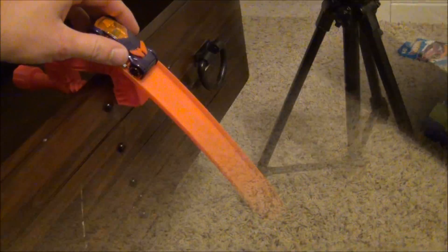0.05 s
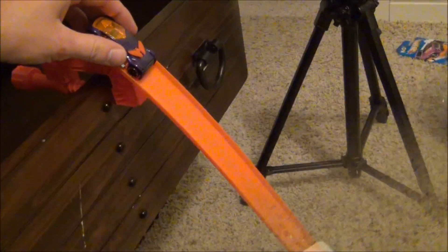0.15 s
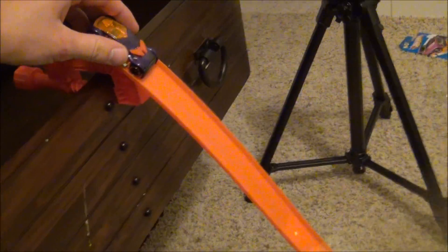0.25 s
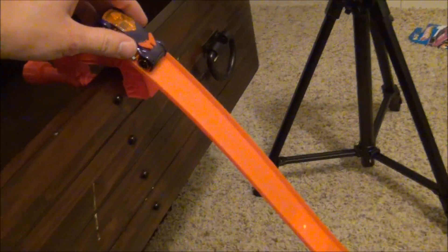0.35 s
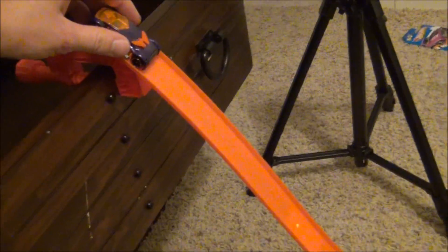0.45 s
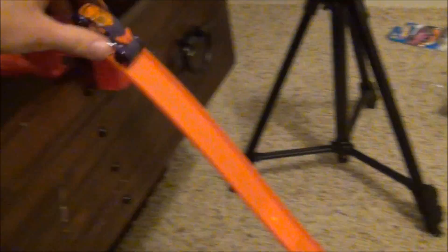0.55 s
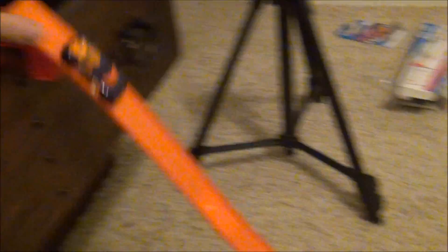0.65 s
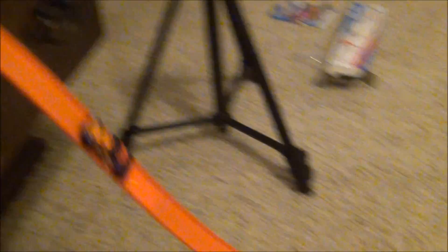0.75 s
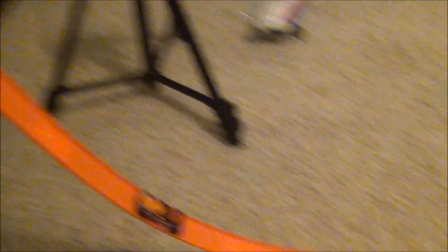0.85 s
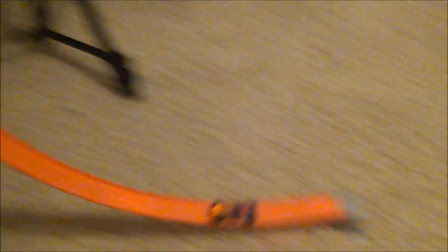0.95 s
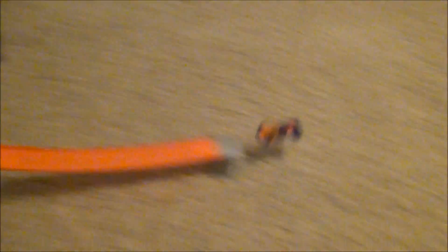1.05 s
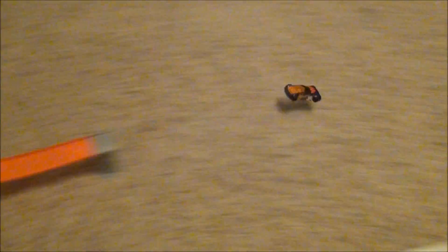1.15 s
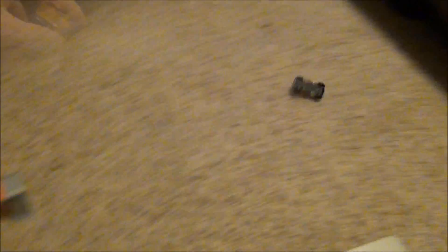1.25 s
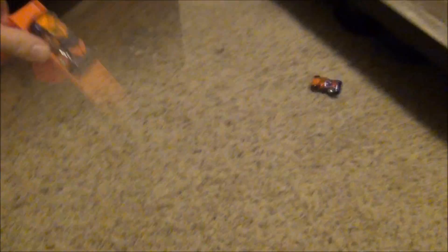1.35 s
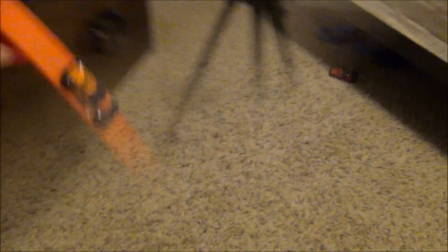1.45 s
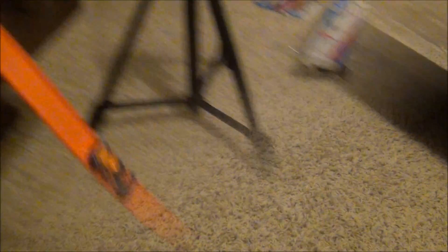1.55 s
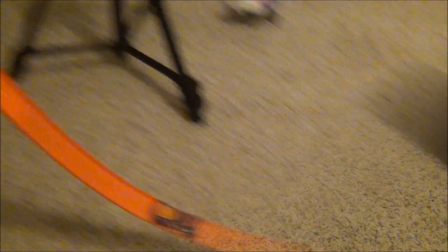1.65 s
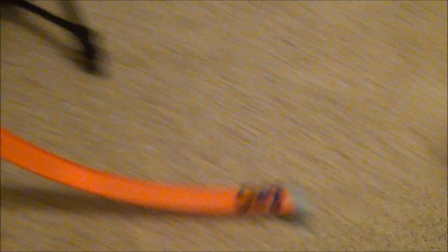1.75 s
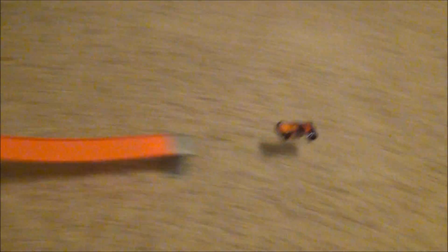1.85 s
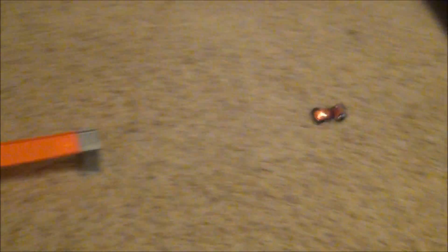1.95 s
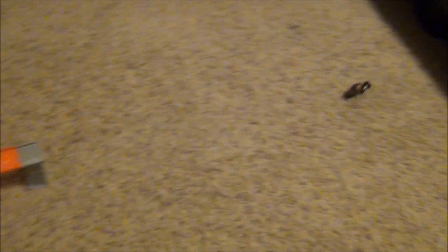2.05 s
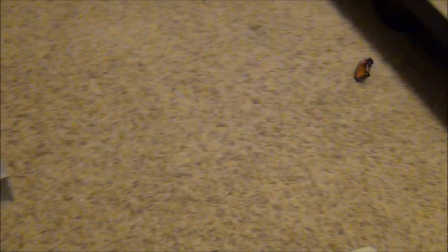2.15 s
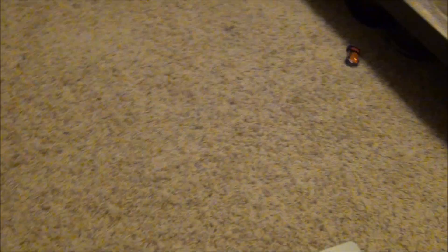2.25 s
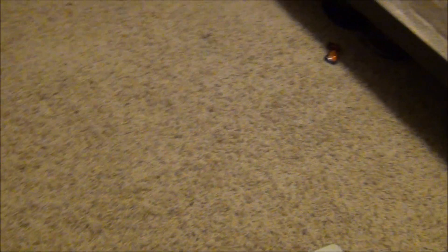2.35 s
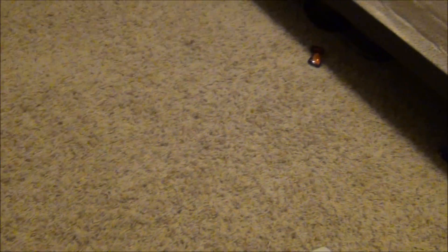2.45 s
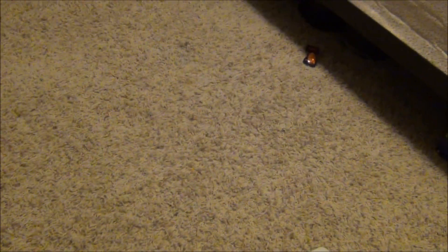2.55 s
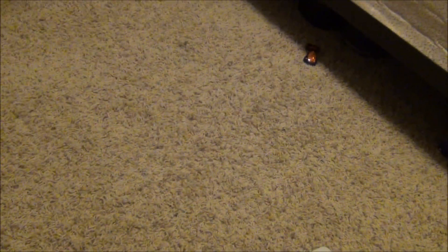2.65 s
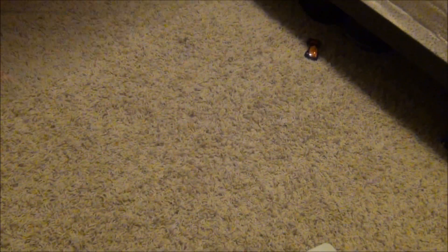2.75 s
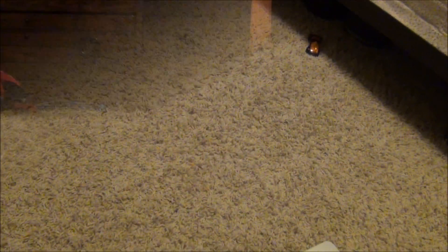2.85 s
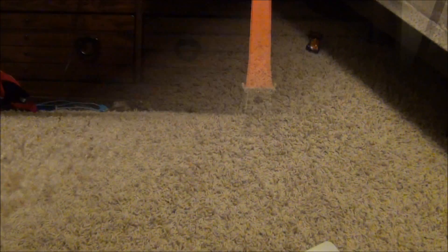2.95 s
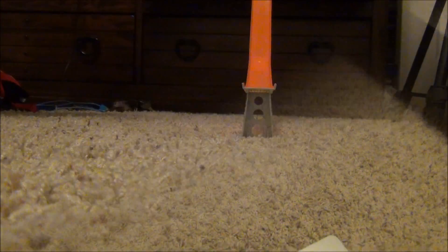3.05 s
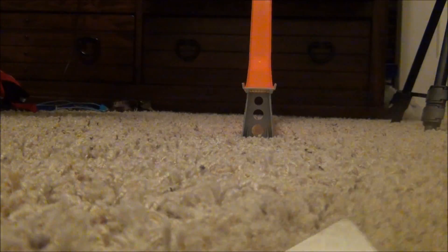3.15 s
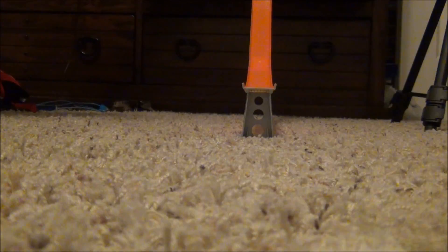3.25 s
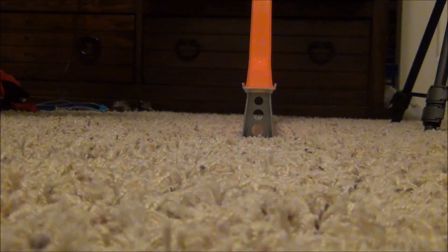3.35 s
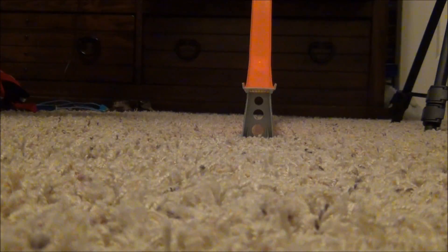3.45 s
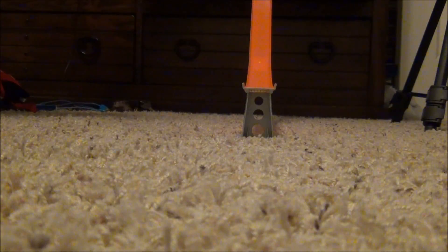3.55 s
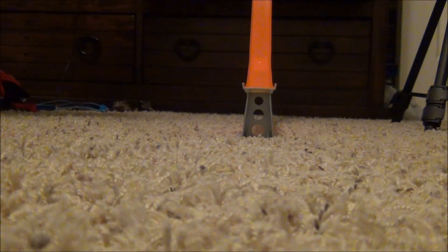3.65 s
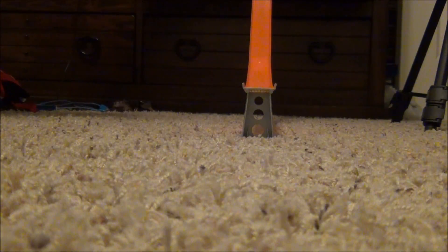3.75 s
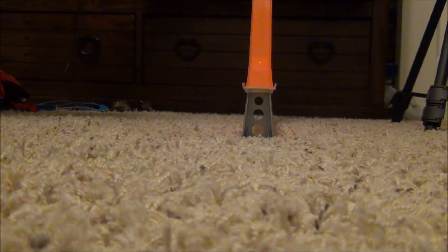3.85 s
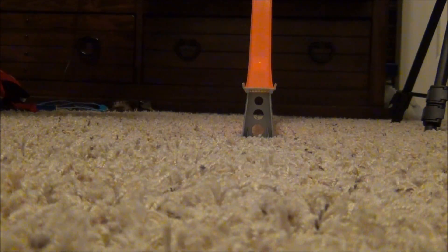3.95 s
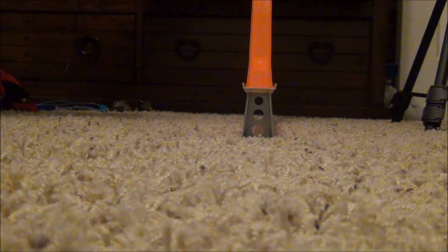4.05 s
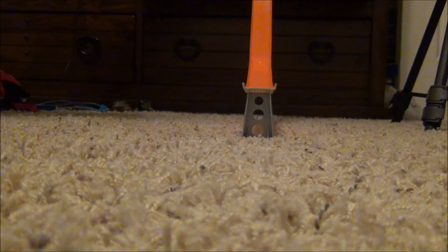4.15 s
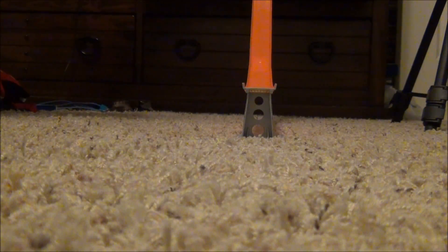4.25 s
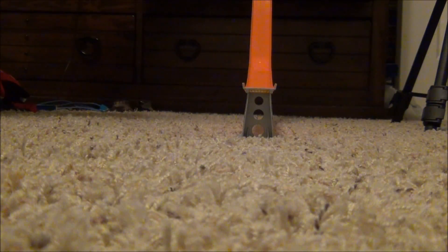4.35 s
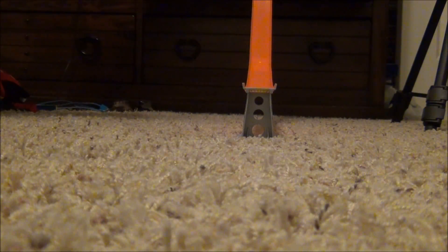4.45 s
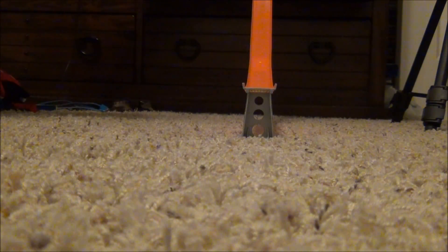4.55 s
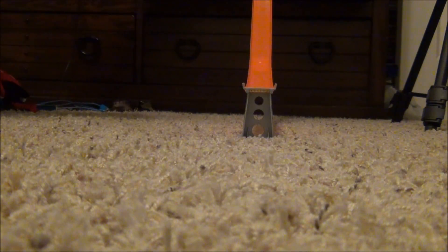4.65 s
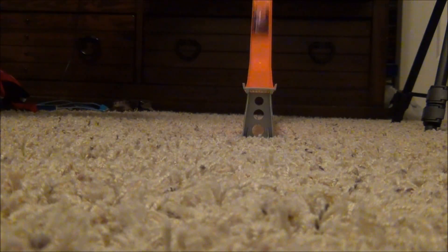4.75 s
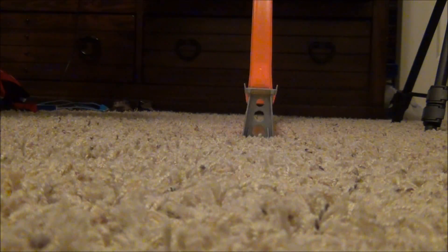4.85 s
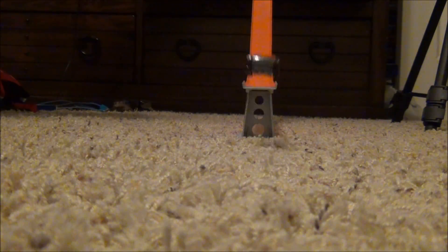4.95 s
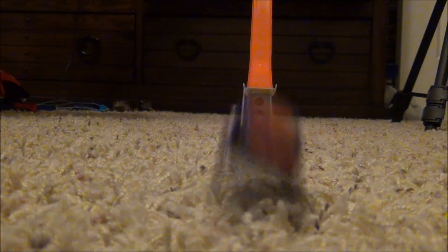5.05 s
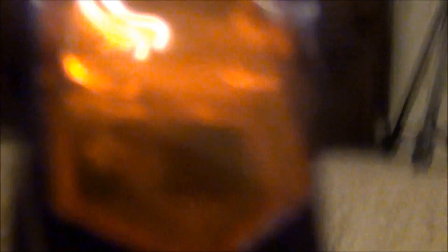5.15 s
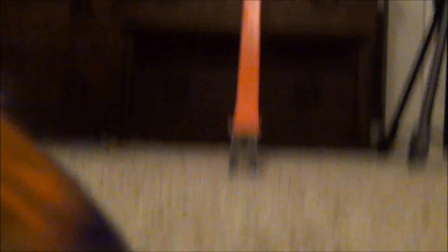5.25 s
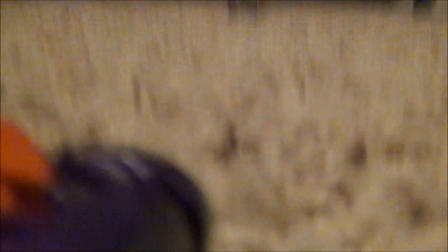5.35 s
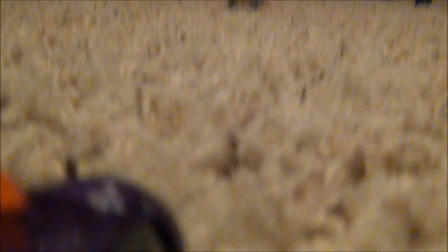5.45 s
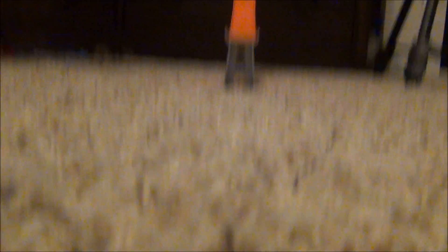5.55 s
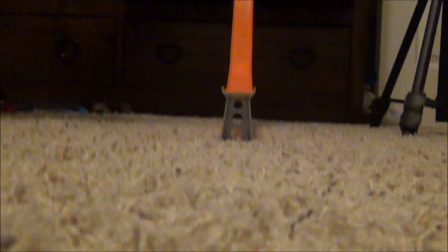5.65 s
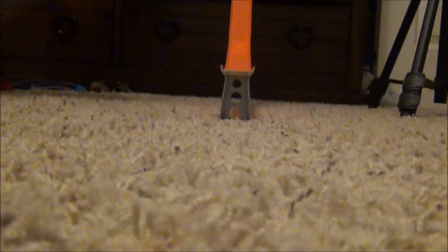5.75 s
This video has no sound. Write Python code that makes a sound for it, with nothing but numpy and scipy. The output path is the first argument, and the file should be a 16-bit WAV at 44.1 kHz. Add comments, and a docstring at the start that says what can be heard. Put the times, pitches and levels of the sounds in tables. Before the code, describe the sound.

A carpeted bedroom, heard closely in stereo with low room tone and hiss. A soft, low zoom motor hum runs until 0.5 s and stops dead. At 0.65 s a small die-cast car starts down a plastic track, its hard-wheeled roar growing louder and brighter until it flies off at 1.1 s, wheels buzzing, and lands with bright knocks at 1.3 s. A second run overlaps from 1.4 to 1.85 s, with a hollow clack at 1.7, then buzzing wheels and tumbling knocks until about 2.5 s. Handling makes a sharp cluster of cracks around 2.75-3.05 s, small plastic ticks, a big booming clack at 3.57 s and more ticks to 4.33 s. A third run rolls from 4.55 to 5.02 s, more colored and slightly softer; at 5.18-5.5 s the car slams and skitters against the camera with dull case thumps, moving left. Two faint ticks end near 5.7 s.

```python
"""A zoom motor hums and stops, then a die-cast toy car runs three times down a plastic track in a carpeted bedroom.
It flies off, lands and tumbles with buzzing wheels; the track gives sharp hollow clacks, the first two struck
by the car, the rest by handling; the last run ends with the car skittering into the camera.
Rolling and spinning are dense trains of tiny random blows; knocks, clacks and ticks are shaped noise bursts with
rings; booms, case bumps and motor hum are sines; the air and the swaying strip are coloured noise."""
import sys
import numpy as np
from scipy import signal
from scipy.fft import rfft, irfft, next_fast_len
from scipy.io import wavfile
from scipy.ndimage import uniform_filter1d, map_coordinates

SR = 44100
rng = np.random.default_rng(int(sys.argv[2]) if len(sys.argv) > 2 else 0)


def persist_wave(psi):
    """Save psi, clipped to +-1, as 16-bit WAV."""
    counts = np.round(np.clip(psi, -1, 1) * 32767).astype(np.int16)
    wavfile.write(sys.argv[1], SR, np.atleast_2d(counts).T)


N = 256220  # length [samples]

# wheels chattering on their axles, spectrum: (frequency [Hz], relative level [dB per Hz])
AXLE_CHATTER = [(2500, -16), (5000, -4), (7400, -3.5), (8800, -5.5), (10200, -1.5), (10800, 0.5),
                (11300, 2), (12300, -7), (15800, -9)]
# sharp crack of hard plastic, spectrum: (frequency [Hz], relative level [dB per Hz])
SHARP_CRACK = [(150, -33), (900, -22), (1600, 6.5), (2300, -8), (3700, 3.5), (4700, -6), (8000, -5.5),
               (15800, -2)]


def amp(db):
    """Decibels to gain."""
    return 10 ** (np.asarray(db) / 20)


def unit(x):
    """Scale to rms 1."""
    return x / np.sqrt(np.mean(x ** 2) + 1e-20)


def along(points, hz):
    """Interpolate (frequency [Hz], value) points on a log frequency axis."""
    point_hz, values = np.transpose(points)
    return np.interp(np.log(hz + 1), np.log(point_hz), values)


def since(s):
    """Seconds elapsed since time s, zero before it."""
    return np.maximum(np.arange(N) / SR - s, 0)


def gate(start, stop, fade_db_per_s):
    """Quick attack, hold, and a steady fade in decibels after the stop."""
    attack_s = 0.025  # time for the wheels to bite
    return np.minimum(since(start) / attack_s, 1) * amp(-fade_db_per_s * since(stop))


def wobble(rate):
    """A smooth random curve, rate knots a second."""
    knots = rng.standard_normal(int(N * rate / SR) + 4)
    return map_coordinates(knots, [np.arange(N) * rate / SR])


def filtered(x, response):
    """Shape x by a response given as a function of frequency in Hz."""
    m = next_fast_len(N + SR // 2)
    return irfft(rfft(x, m) * response(np.fft.rfftfreq(m, 1 / SR)), m)[..., :N]


def noise(spectrum):
    """Coloured noise of rms 1."""
    return unit(filtered(rng.standard_normal(N), lambda hz: amp(along(spectrum, hz))))


def add(track, s, sound):
    """Mix a sound in at time s."""
    room_left = track[round(s * SR):][:len(sound)]
    room_left += sound[:len(room_left)]


def blow(spectrum, t60, ring_db, tilt=0, focus_hz=4000, focus_db=0, uneven_db=0,
         crack=0.0068, rise=0.00014, size=8192):
    """One contact of energy 1: a crack and a ring of dense modes, coloured by the spot that is struck."""
    t, hz = np.arange(size) / SR, np.fft.rfftfreq(size, 1 / SR)
    # crack and t60 are the times in s to fall by 60 dB
    decay = amp(-60 * t / crack) + amp(ring_db - 60 * t / t60)
    burst = rng.standard_normal(size) * decay * (1 - np.exp(-t / rise))
    spot = uneven_db * map_coordinates(rng.standard_normal(32), [hz / SR * 60])
    focus = focus_db * np.exp(-(np.log2((hz + 1) / focus_hz) / 0.15) ** 2)
    level = along(spectrum, hz) + tilt * np.log2((hz + 500) / 4000) + spot + focus
    # minimum-phase colouring keeps the attack sharp
    cepstrum = irfft(np.log(amp(level)))
    hit = irfft(rfft(burst) * np.exp(rfft(2 * cepstrum[:size // 2], size)))
    return hit / np.linalg.norm(hit)


def rattle(spectrum, rate, scatter_db, t60, ring_db, uneven_db=0, count=12):
    """Irregular tiny blows, rate a second over count contact points, each with its own ring; about rms 1."""
    out = np.zeros(N)
    number = int(rate / count * N / SR)
    for point in range(count):
        places = rng.integers(N, size=2000)
        sizes = np.clip(rng.standard_normal(2000), -2, 1.6)
        # the car rocks, so its weight and the colour shift from point to point
        load = 4 * np.clip(rng.standard_normal(N // 1200 + 1), -2, 1.5)
        blows_db = scatter_db * sizes + load[places // 1200]
        kicks = np.bincount(places[:number], amp(blows_db)[:number], N)
        contact = blow(spectrum, t60, ring_db, uneven_db=uneven_db, crack=0.001)
        out += signal.oaconvolve(kicks, contact)[:N]
    # even out the level over 40 ms, however the blows fall
    power = uniform_filter1d(out ** 2, SR // 25)
    return out / np.sqrt(np.abs(power) + 1e-9)


def widen(mid, side):
    """Two close microphones: nearly alike in the bass, further apart above it."""
    # how much the microphones differ: (frequency [Hz], side share [dB])
    side_share = [(100, -18.5), (250, -14), (600, -7.5), (3000, -5), (15000, -7.5)]
    side = filtered(side, lambda hz: amp(along(side_share, hz)))
    return np.array([mid + side, mid - side])


def nearby(x, scatter_db):
    """Close surfaces scatter the sound differently to each microphone."""
    scatter = blow([(20, 0), (16000, 0)], t60=.02, ring_db=0)
    return widen(x, amp(scatter_db) * signal.oaconvolve(x, scatter)[:N])


def bedroom(x):
    """Walls and furniture answer briefly after 3 ms, the bass dying first."""
    # reverberation of the room: (frequency [Hz], time to fall by 60 dB [s])
    decay_times = [(120, 0.098), (500, 0.096), (3000, 0.26), (8000, 0.26), (15000, 0.22)]
    hz, t, z = signal.stft(rng.standard_normal((2, SR // 2)), SR, nperseg=256)
    fade = amp(-60 * t / along(decay_times, hz)[:, None])
    tail = signal.istft(z * fade, SR, nperseg=256)[1]
    late = np.pad(x, (round(.003 * SR), 0))
    return widen(*signal.fftconvolve(late[None], tail / np.linalg.norm(tail[0]), axes=1)[:, :N])


def air():
    """Wavering low room tone under hiss, both noise stepping in level, with a very faint whine at first."""
    # background stretches: (start [s], room tone level [dB], hiss level [dB])
    stretches = [(0, -47, -51), (1.43, -55.5, -54), (2.735, -46.5, -47.5), (4.0, -48, -50),
                 (5.3, -54, -56.5)]
    # room tone and hiss, spectrum: (frequency [Hz], relative level [dB per Hz])
    hush_spectrum = [(15, -66), (25, -26), (80, -5.5), (126, -3.5), (184, -4), (216, -5.5), (342, -7.5),
                     (587, -7), (729, -9), (905, -4.5), (1060, -12.5), (1360, -12), (3580, -20),
                     (10800, -22), (15800, -21)]
    # narrow whine, spectrum: (frequency [Hz], relative level [dB per Hz])
    whine_spectrum = [(2300, -60.5), (2540, -4), (2600, 3), (2660, -13), (2900, -61.5)]
    starts, *levels = np.transpose(stretches)
    stretch = np.searchsorted(starts[1:], np.arange(N) / SR)
    # each step glides over about 20 ms
    tone, hiss = amp(uniform_filter1d(np.array(levels)[:, stretch], size=900, axis=1))
    hush = widen(noise(hush_spectrum), noise(hush_spectrum))
    low = filtered(hush, lambda hz: 1 / (1 + (hz / 2200) ** 4))
    whine = amp(-61.5 + 1.5 * wobble(25)) * noise(whine_spectrum)
    whine *= np.arange(N) < 2.73 * SR
    return tone * amp(wobble(5.5)) * unit(low) + hiss * unit(hush - low) + whine


def zoom():
    """The zoom motor's gears hum at multiples of the shaft rate, slightly unsteady, and stop dead."""
    # gear hum: (multiple of the shaft rate, relative level [dB])
    harmonics = [(3, -14.5), (4, -8.5), (5, -10.5), (7, -13), (8, 1), (9, -11), (11, -8.5), (13, -10),
                 (15, -12), (17, -7.5), (19, -15), (20, -11.5), (28, -17)]
    # motor noise, spectrum: (frequency [Hz], relative level [dB per Hz])
    motor_spectrum = [(30, -25), (80, 1), (200, -7.5), (480, -5.5), (650, -13.5), (1200, -32),
                      (4000, -28.5)]
    t = np.arange(N) / SR
    turns = 25.68 * t + .008 * wobble(12)  # shaft turns a second, plus jitter
    hum = np.zeros(N)
    for order, db in harmonics:
        phase = order * turns + rng.random()
        hum += amp(db + 1.8 * wobble(11.4)) * np.sin(2 * np.pi * phase)
    running = np.clip((.51 - t) / .01, 0, 1)
    return running * (amp(-34.0) * hum + amp(-43.0) * noise(motor_spectrum))


def swaying():
    """The long strip flexes with a low flutter of noise that swells and dies away."""
    # the strip sways after a run or under the hand: (strongest moment [s], level [dB])
    sways = [(1.135, -40), (1.29, -43), (2.98, -46), (3.5, -39)]
    # flutter, spectrum: (frequency [Hz], relative level [dB per Hz])
    flutter_spectrum = [(40, -17), (100, -2), (130, 1.5), (190, 0.5), (260, -2.5), (400, -14.5), (900, -41)]
    rise_db_per_s, fade_db_per_s = 200, 57
    t = np.arange(N) / SR
    swing = np.zeros(N)
    for s, db in sways:
        swing += amp(db - rise_db_per_s * np.maximum(s - t, 0) - fade_db_per_s * since(s))
    return swing * noise(flutter_spectrum)


def clacks_and_ticks():
    """The track cracks, rings hollow and booms, struck by the car or handled; fingers tick on the plastic."""
    # hollow clacks of the track, the first two struck by the car, the rest by handling:
    # (time [s], crack level [dB], crack brightness [dB per octave], hollow ring level [dB], boom level [dB])
    clacks = [(1.690, -12, -2, -10.5, -11.5), (2.05, -17, 3, -14, -21.5), (2.739, -45, 5, -29, -28),
              (2.8304, -7, 1.5, -18.5, -11), (2.882, -15, 3, -26, -19.5), (2.916, -27.5, 1, -25.5, -16.5),
              (3.036, -45, -1, -23, -27), (3.568, -7, -1, -21, -9.5), (3.875, -57.5, 6, -32.5, -27)]
    # light ticks of plastic under the fingers: (time [s], level [dB], accented frequency [Hz])
    finger_ticks = [(3.143, -24.5, 4650), (3.236, -28, 4800), (3.324, -21, 10600), (3.424, -19.5, 2870),
                    (3.472, -26.5, 2940), (3.55, -28, 4180), (3.761, -25.5, 8100), (3.843, -16.5, 11000),
                    (4.306, -24.5, 9050), (4.329, -26, 4640), (5.669, -36, 2600), (5.727, -37, 3960)]
    # low booming of a clack: (frequency [Hz], relative level [dB], time to fall by 60 dB [s])
    boom_modes = [(131.5, 2, 0.29), (161.8, -5.5, 0.27), (189, -4, 0.31), (248.7, -5, 0.29),
                  (508.6, -4, 0.2), (710, -6, 0.2), (1410, -16, 0.36), (1480, 1, 0.14), (1680, -10, 0.27)]
    # hollow ring, spectrum: (frequency [Hz], relative level [dB per Hz])
    hollow_spectrum = [(60, -36), (200, -15), (330, -2), (500, 0.5), (700, 0), (850, 1), (1200, -1),
                       (1500, -2), (1850, -2.5), (2300, -12.5), (2700, -9), (3800, -9.5), (4600, -17),
                       (15800, -13.5)]
    # ticking plastic, spectrum: (frequency [Hz], relative level [dB per Hz])
    plastic_spectrum = [(200, -19), (1500, -3), (3200, -4.5), (4200, 1.5), (5500, -8.5), (8000, -4.5),
                        (9500, -9), (11500, -1), (15800, -29)]
    out, t = np.zeros(N), np.arange(SR // 2) / SR
    for s, crack_db, tilt, ring_db, boom_db in clacks:
        crack = blow(SHARP_CRACK, t60=.05, ring_db=-28, tilt=tilt, crack=0.014)
        add(out, s, amp(crack_db + 14) * crack)
        add(out, s, amp(ring_db + 20) * blow(hollow_spectrum, t60=.15, ring_db=-4, rise=.001))
        boom = np.zeros(len(t))
        for hz, level, t60 in boom_modes:
            mode_db = level + 2 * rng.standard_normal()
            boom += amp(mode_db - 60 * t / t60) * np.sin(2 * np.pi * hz * t)
        add(out, s, amp(boom_db - 17.0) * boom * (1 - np.exp(-t / 0.0065)))
    for s, db, focus_hz in finger_ticks:
        # a higher tick is also a brighter one
        tilt = -0.65 + 3.2 * np.log2(focus_hz / 4000)
        tick = blow(plastic_spectrum, t60=0.063, ring_db=-17, tilt=tilt, focus_hz=focus_hz, focus_db=8.5,
                    crack=0.0084, rise=0.00075)
        add(out, s, amp(db + 12.5) * tick)
    return out


def bumps():
    """Dead knocks through the camera's case to its microphone: sines that die within a few cycles."""
    # the car bumps the case: (time [s], level [dB], centre frequency [Hz])
    case_bumps = [(5.184, -11, 485), (5.188, -3, 510), (5.243, -5.5, 466), (5.25, -0.5, 317),
                  (5.308, -3, 1060), (5.469, -5, 1210), (5.486, -8.5, 930)]
    out, t = np.zeros(N), np.arange(SR // 20) / SR
    for s, db, hz in case_bumps:
        add(out, s, amp(db - 3.5) * np.sin(2 * np.pi * hz * t) * np.exp(-t * hz / 0.73))
    return filtered(out, lambda hz: (1j * hz / (70 + 1j * hz)) ** 2)  # bass cut below 70 Hz


def car_body(hz):
    """Resonances of the metal shell on its plastic base, alternating in sign."""
    # body modes: (frequency [Hz], width [Hz], relative level [dB])
    body_modes = [(1695, 80, -3), (1860, 24, -10), (2453, 26, 3), (2760, 210, 3.5), (3183, 31, 9),
                  (4150, 340, -4), (5060, 250, -6)]
    response = 0
    for k, (centre, width, db) in enumerate(body_modes):
        damping = 1j * hz * width
        response = response + (-1) ** k * amp(db) * damping / (centre * centre - hz * hz + damping)
    return response


def clatter():
    """Landings and tumbles: one or a quick string of bright knocks, then the body rings."""
    # the car strikes something:
    # (time [s], level [dB], knocking span [s], brightness [dB per octave], accented frequency [Hz])
    strikes = [(0.701, -13, .005, -6, 2460), (1.301, -1, .025, 1.5, 10600), (1.403, -4, .005, 4.5, 9700),
               (1.436, -8.5, .005, 2, 2850), (1.557, -1.5, .005, 3, 10200), (1.825, -1, .005, 3, 10200),
               (2.053, -3, .015, 5, 2950), (2.098, -9.5, .005, -3, 2720), (2.276, -16, .005, 2, 3120),
               (2.315, -15, .015, 1.5, 3100), (2.455, -30.5, .005, -1, 10400), (5.184, 0.5, .035, -1, 7660),
               (5.244, -0.5, .015, -2.5, 10900), (5.308, -8, .005, 1.5, 3060),
               (5.384, -5.5, .025, 10, 10500), (5.434, -6.5, .005, 1.5, 11500),
               (5.468, -7.5, .005, -5.5, 6900), (5.505, -10.5, .015, -1.5, 11100)]
    # the car's shell, spectrum: (frequency [Hz], relative level [dB per Hz])
    shell_spectrum = [(100, -9), (700, -13), (1300, -2.5), (1800, -6), (3000, 4.5), (5500, -3), (7800, 0.5),
                      (9000, -3), (11200, 0), (13000, -3.5), (15800, -11)]
    # nose, tail and wheels hit in turn, each a little softer
    knock_gap_s, knock_loss_db = .0095, 1
    out = np.zeros(N)
    for s, db, length, tilt, focus_hz in strikes:
        delays = np.arange(0, max(length, knock_gap_s), knock_gap_s)
        for k, delay in enumerate(delays):
            hit = blow(shell_spectrum, t60=0.08, ring_db=-9.5, tilt=tilt, focus_hz=focus_hz, focus_db=8,
                       crack=0.0086, rise=0.0015)
            add(out, s + delay, amp(db + 11.5 - knock_loss_db * k) * hit)
    return out + amp(-9) * filtered(out, car_body)


def spinning():
    """Free wheels buzz on loose axles and ring the car's body, fading after each jolt."""
    # a jolt sets the free wheels rattling until they touch something:
    # (jolt [s], stopped [s], body ring level [dB], tick level [dB])
    spins = [(1.114, 1.27, -32, -25.5), (1.288, 1.5, -30, -36), (1.83, 2.19, -28.5, -22),
             (2.138, 2.596, -34, -32.5), (5.048, 5.153, -31.5, -23.5), (5.148, 5.244, -22, -20.5),
             (5.258, 5.346, -24, -18.5), (5.333, 5.497, -26, -26.5)]
    coast_db_per_s, stop_db_per_s = 75, 400  # steady fade; extra fade once stopped
    ring, tick = np.zeros((2, N))
    for start, stop, ring_db, tick_db in spins:
        spin = gate(start, stop, stop_db_per_s) * amp(-coast_db_per_s * since(start))
        ring += amp(ring_db) * spin
        tick += amp(tick_db) * spin
    buzz = rattle(SHARP_CRACK, rate=770, scatter_db=4, t60=0.0043, ring_db=-32.0)
    body = unit(filtered(buzz, car_body))
    ticks = rattle(AXLE_CHATTER, rate=420, scatter_db=5, t60=.025, ring_db=-9, uneven_db=4)
    return amp(3 * wobble(23)) * ring * body + tick * ticks  # the body ring wavers


def drive(power):
    """Rolling strength, a power of speed: the car speeds up evenly, rounds the bend, coasts and flies off."""
    # runs down the track: (let go [s], leaves the end [s], level at full speed [dB], starting speed [0-1])
    runs = [(0.654, 1.107, -17, 0.2), (1.402, 1.855, -16.5, 0.21), (4.557, 5.022, -21.5, 0.16)]
    ramp_s = 0.3  # the car gathers speed until the track levels out
    bend_db, bend_s = 1.5, 0.014  # the bend at the foot of the slope presses the wheels down for a moment
    track_fade_db_per_s = 291  # the strip rings out once the car has left
    out, t = np.zeros(N), np.arange(N) / SR
    for start, leaves, db, push in runs:
        speed = np.clip(push + (1 - push) * since(start) / ramp_s, 0, 1)
        pressed_db = bend_db * np.exp(-((t - start - ramp_s) / bend_s) ** 2)
        out += amp(db + pressed_db) * speed ** power * gate(start, leaves, track_fade_db_per_s)
    return out


def rolling():
    """Hard wheels roar on the strip, chatter on their axles and drum its span, all as tiny blows."""
    # wheels on the strip, spectrum: (frequency [Hz], relative level [dB per Hz])
    roar_spectrum = [(40, -44), (300, -31), (650, -17.5), (950, -10), (1200, -12.5), (1700, -5), (2150, -3),
                     (2850, 4.5), (3500, -4), (4150, -2.5), (5000, -8.5), (6000, -13.5), (9000, -22.5)]
    # the drumming span, spectrum: (frequency [Hz], relative level [dB per Hz])
    drum_spectrum = [(40, -42), (85, -30), (130, 0.5), (200, -11.5), (290, 6.5), (400, 0.5), (520, -1),
                     (650, -16.5), (1200, -33.5)]
    # the track's colour as heard from down on the carpet: (frequency [Hz], gain [dB])
    carpet_colour = [(130, 6.5), (300, -0.5), (500, 5), (680, 10), (1000, 3.5), (2500, -0.5), (4000, 4),
                     (5000, -1), (9000, -0.5), (11700, 6.5), (15000, -1)]
    roar = drive(1.11)
    hard = rattle(roar_spectrum, rate=1100, scatter_db=4, t60=.035, ring_db=-12, uneven_db=5, count=24)
    soft = filtered(hard, lambda hz: 1 / np.sqrt(1 + (hz / 2600) ** 6))
    # a faster car strikes harder and sounds brighter
    force = np.clip(roar / amp(-19), 0, 1)
    strip = roar * ((1 - force) * soft + force * hard)
    # the axles chatter unevenly as the car rocks
    chatter = drive(1.86) * amp(-3.5 + 2 * wobble(35))
    axles = chatter * rattle(AXLE_CHATTER, rate=650, scatter_db=6.5, t60=0.025, ring_db=-14.5,
                             uneven_db=3, count=20)
    drumming = rattle(drum_spectrum, rate=360, scatter_db=8, t60=0.13, ring_db=-4.0)
    span = amp(-13) * drive(1.2) * drumming
    sound = strip + axles + span
    last_run = np.arange(N) > 4 * SR
    return np.where(last_run, filtered(sound, lambda hz: amp(along(carpet_colour, hz))), sound)


def scene():
    """Far sounds are wetter; at the camera the car is drier and moves to the left."""
    # where the car is: (time [s], left minus right [dB])
    car_pan = [(1.0, 1.5), (1.3, 1.5), (1.7, 3), (2.1, .3), (5.1, 0), (5.3, 5.5), (5.5, 8.5)]
    t = np.arange(N) / SR
    car = rolling() + spinning() + clatter()
    near = np.interp(t, [5.0, 5.2], [0, 1])
    pan_db = np.interp(t, *np.transpose(car_pan))
    track = clacks_and_ticks() + swaying()
    scatter_db, case_scatter_db = -10.5, 2  # side sound from near surfaces and through the case
    direct = nearby(car, scatter_db) * amp(np.array([pan_db, -pan_db]) / 2)
    direct += nearby(track, scatter_db) + nearby(bumps(), case_scatter_db)
    wet = bedroom(car * amp(-7.0 - 6.5 * near) + amp(-6.0) * track)
    return direct + wet + zoom() + air()


def record(dry):
    """Peaks are rounded at full scale; then nothing is kept from 16 kHz up."""
    held = dry / (1 + np.abs(dry) ** 6) ** (1 / 6)
    return filtered(held, lambda hz: hz < 16000)


dry = scene()
out = record(dry)
persist_wave(out)
```